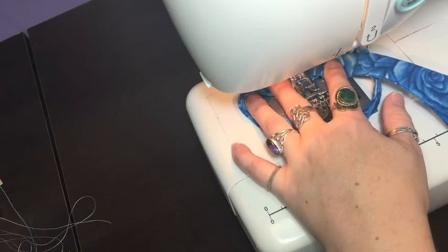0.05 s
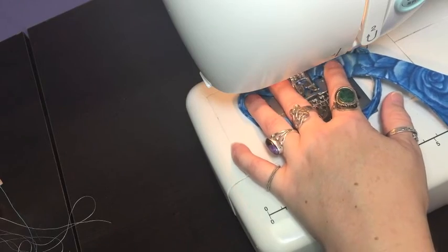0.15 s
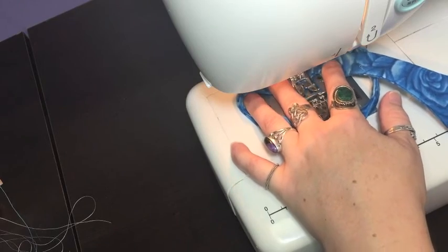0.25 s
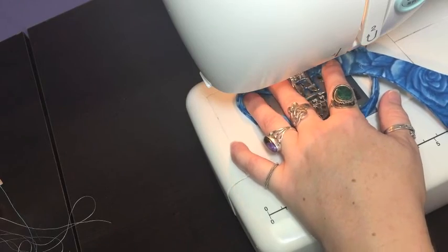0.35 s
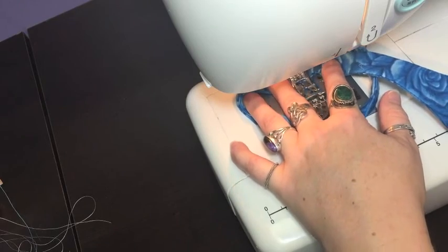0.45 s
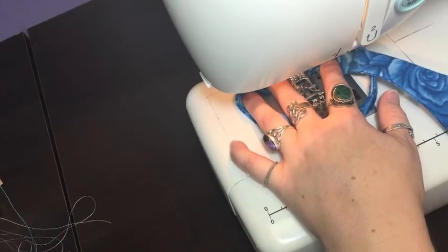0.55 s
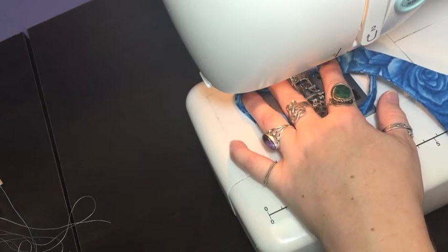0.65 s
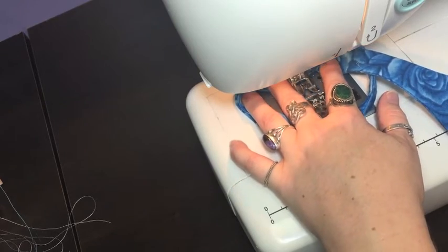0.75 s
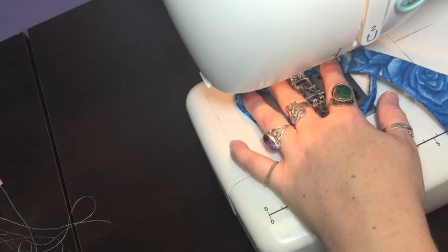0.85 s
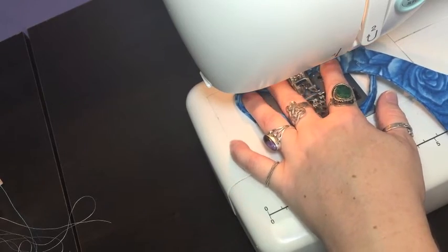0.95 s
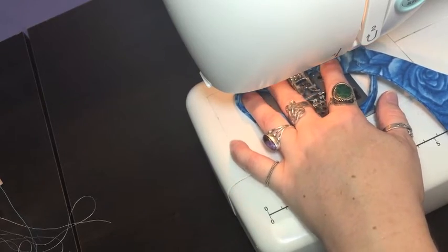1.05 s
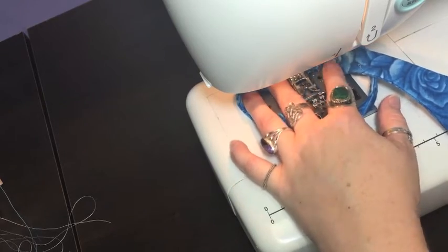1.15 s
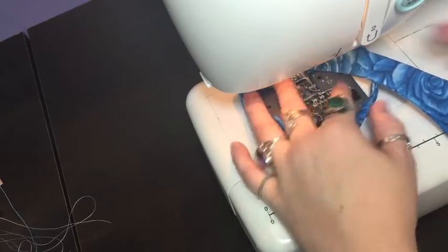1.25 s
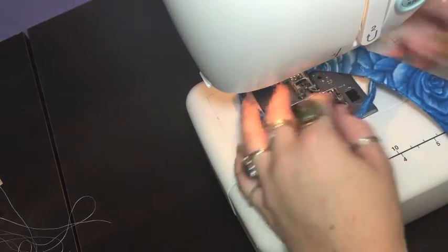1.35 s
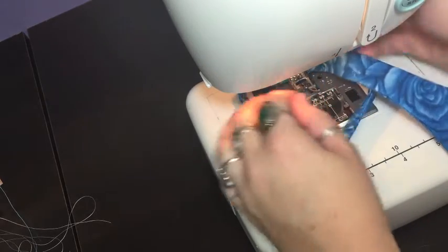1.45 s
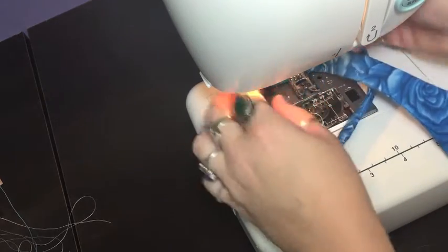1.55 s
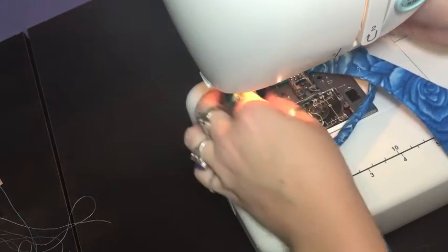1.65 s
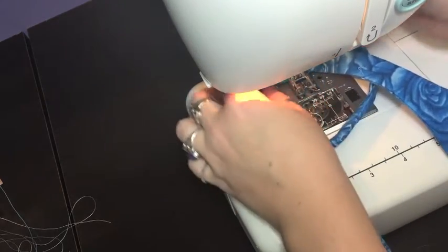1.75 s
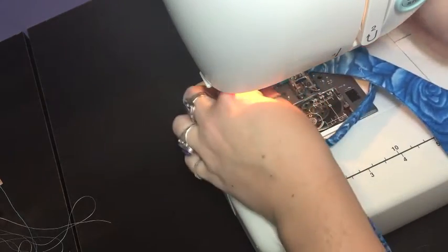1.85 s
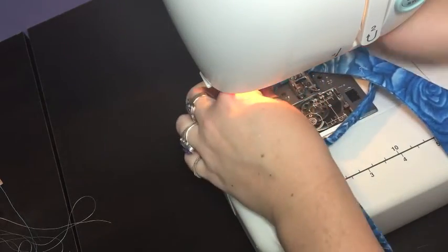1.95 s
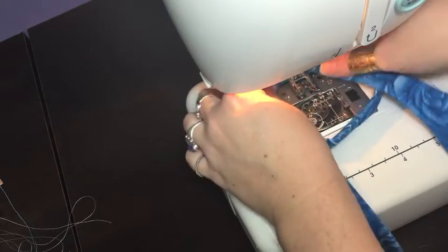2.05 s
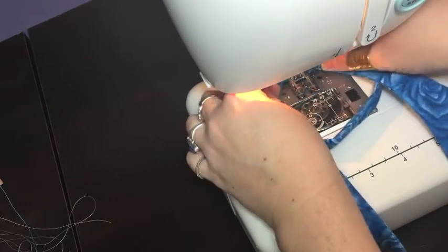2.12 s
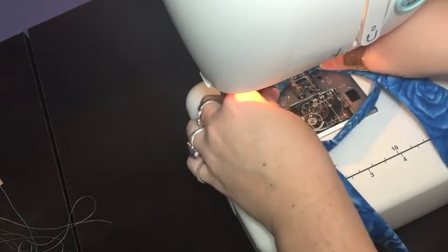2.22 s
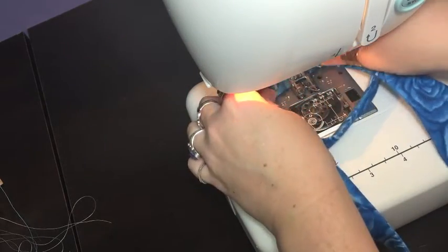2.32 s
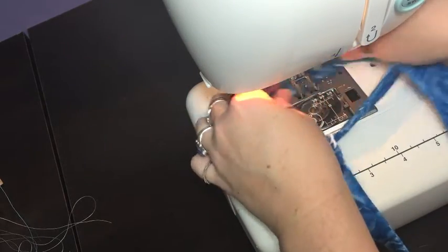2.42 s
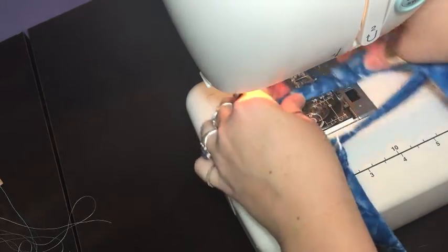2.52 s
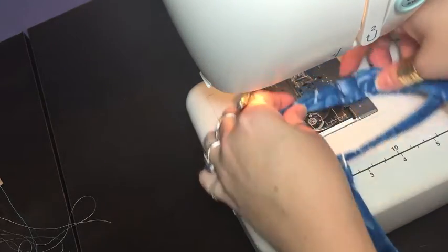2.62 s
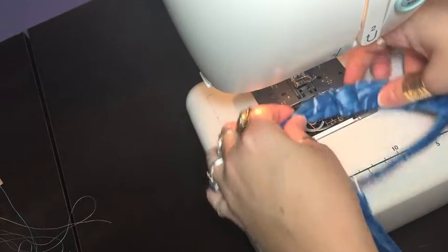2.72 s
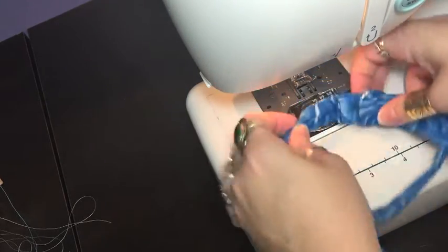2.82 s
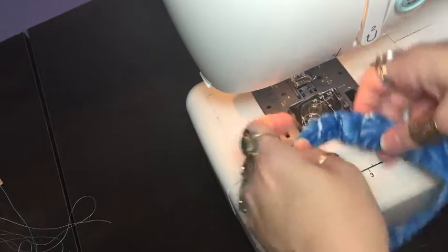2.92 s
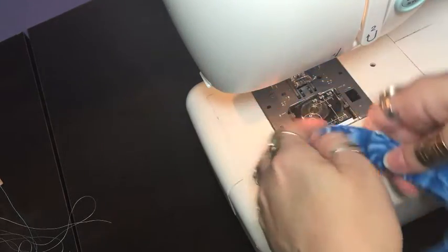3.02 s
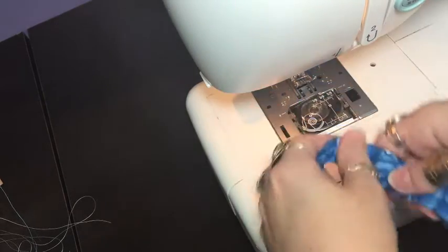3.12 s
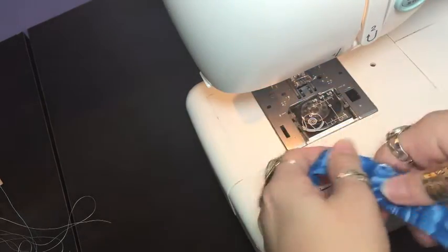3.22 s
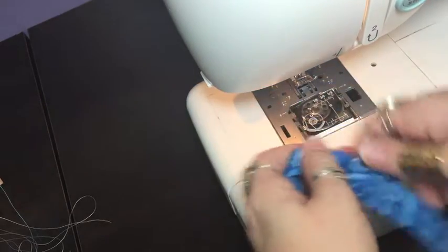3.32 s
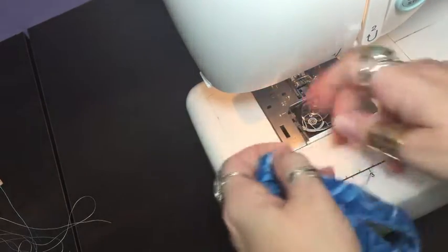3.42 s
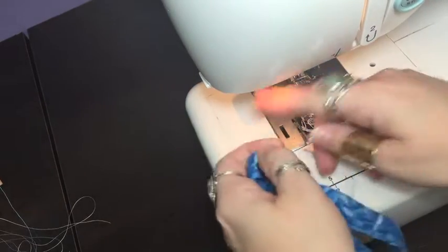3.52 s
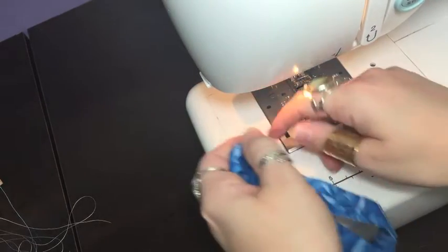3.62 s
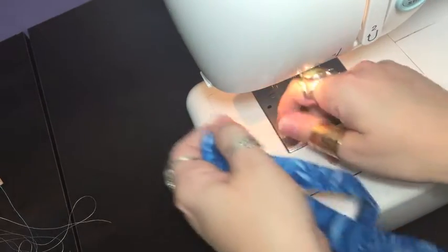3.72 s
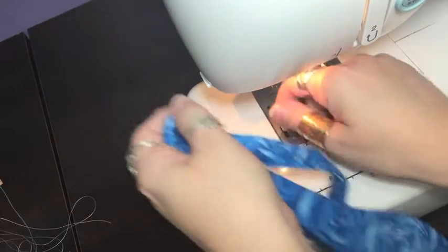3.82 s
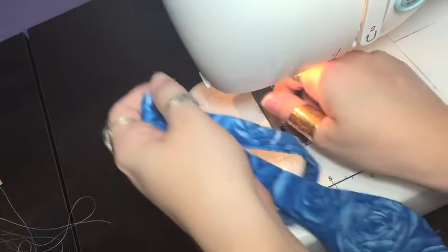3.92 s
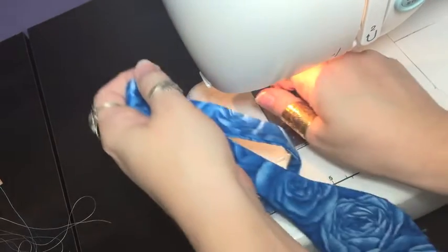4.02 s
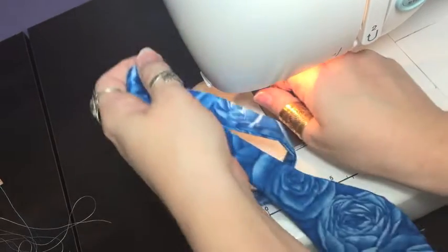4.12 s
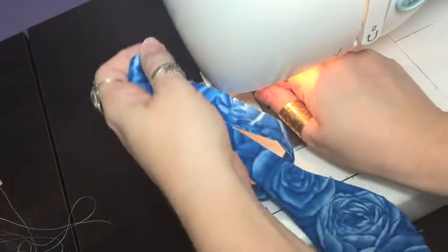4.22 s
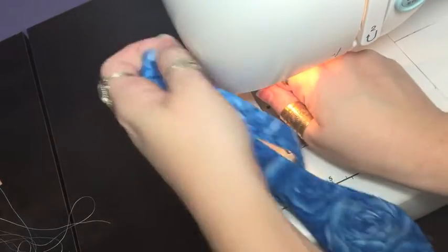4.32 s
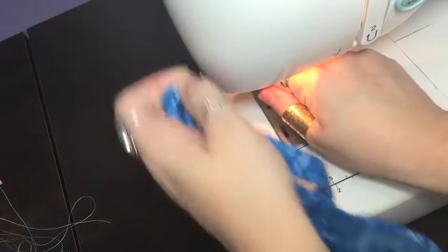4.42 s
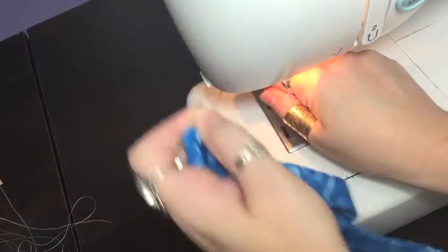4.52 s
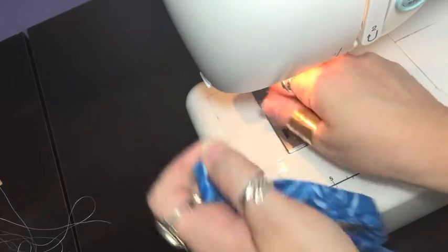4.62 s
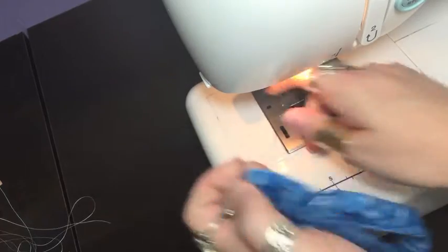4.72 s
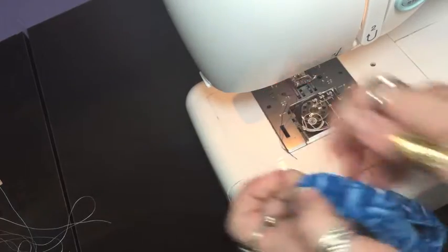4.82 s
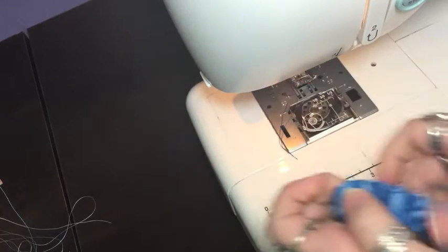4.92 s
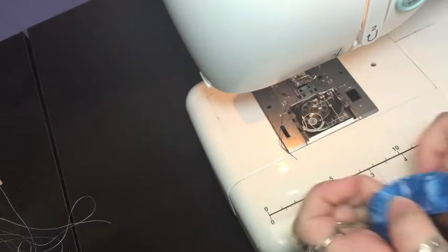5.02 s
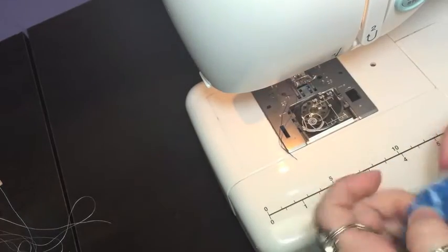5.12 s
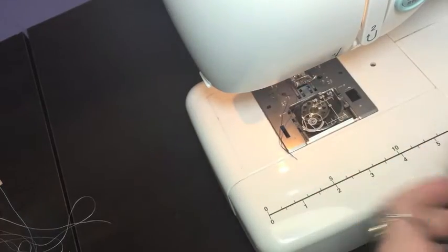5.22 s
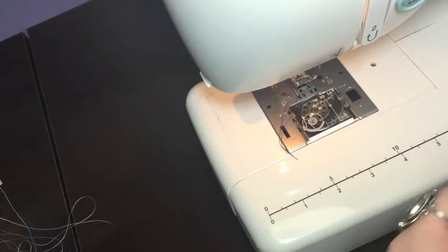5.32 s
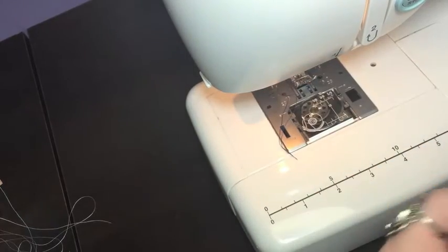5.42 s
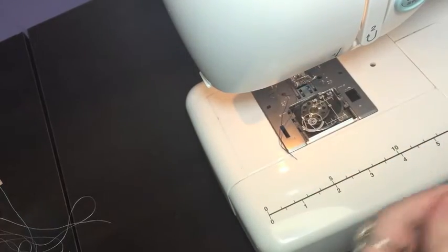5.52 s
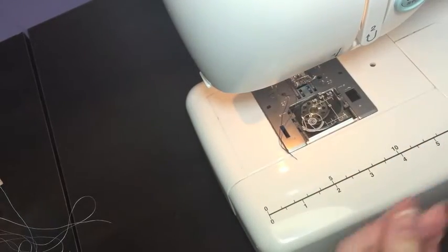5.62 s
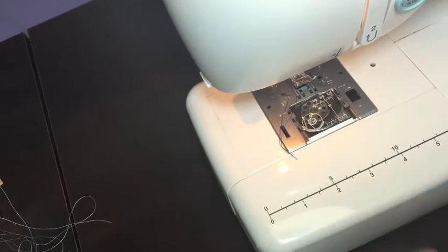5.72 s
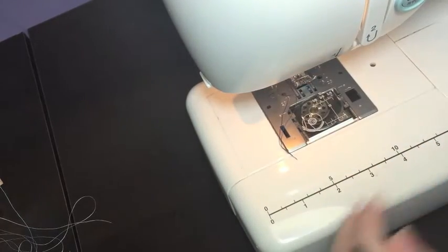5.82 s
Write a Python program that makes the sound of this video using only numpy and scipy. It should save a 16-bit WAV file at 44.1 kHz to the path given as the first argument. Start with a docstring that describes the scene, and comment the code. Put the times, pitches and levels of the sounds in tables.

```python
"""A small furnished room, a phone microphone close to a domestic sewing machine.
The motor hums, gears rumble and links rattle through three last stitches, each slower, then stop.
The presser foot is lifted; the work is drawn out, its threads slipping through the guides, ticking as
they catch, and rasping over metal edges and the side cutter. Levers, rings and fingernails click on
the plastic housing, and arms bump the table, all over quiet room air and a low hum."""
import sys
import numpy as np
from scipy import signal
from scipy.fft import rfft, irfft, next_fast_len
from scipy.io import wavfile
from scipy.ndimage import uniform_filter1d

SR = 44100
rng = np.random.default_rng(int(sys.argv[2]) if len(sys.argv) > 2 else 0)


def unload_audio(sound):
    """Save the sound as a 16-bit wav file, at the path given as the first command line argument."""
    columns = np.transpose(np.atleast_2d(sound))
    # keep every value between -1 and 1, then stretch to whole-number steps
    steps = np.round(np.clip(columns, -1, 1) * 32767)
    wavfile.write(sys.argv[1], SR, steps.astype(np.int16))


N = 258676
TIME = np.arange(N) / SR

# room tone spectrum: (frequency [Hz], level [dB])
AIR_SPECTRUM = [(15, -55), (25, -49), (44, -8), (66, 1.5), (91, -8.5), (122, -1), (198, -12.5), (227, -18),
                (267, -16), (482, -25), (537, -22), (631, -26.5), (1490, -26.5), (1750, -28.5),
                (15500, -47)]
# motor hum, swelling and sagging with the load: (time [s], level [dB])
MOTOR_HUM = [(0.0, -38.5), (0.118, -35), (0.142, -49), (0.206, -32.5), (0.244, -47), (0.288, -32.5),
             (0.454, -40), (0.526, -53), (0.556, -44), (0.604, -32), (0.658, -53), (0.734, -48),
             (0.828, -37.5), (0.924, -38), (1.032, -54), (1.08, -45), (1.172, -49), (1.22, -81)]
# motor whirr, rising as each stitch loads it: (time [s], pitch [Hz], level [dB])
MOTOR_WHIRR = [(0, 421, -60), (.17, 455.5, -50), (.3, 440, -83), (0.48, 429.5, -39.5), (0.572, 547, -60),
               (0.679, 497, -73), (1.1, 507, -51.5), (1.2, 464.4, -90)]
# drive on the gear train, easing once before the last stitch: (time [s], level [dB])
GEAR_DRIVE = [(0, -43.5), (0.11, -44), (0.61, -47), (0.701, -56.5), (0.77, -48.5), (0.86, -50), (1.11, -52),
              (1.19, -76)]
# spectra of the gear rumble and the link rattle: (frequency [Hz], level [dB])
RUMBLE_SPECTRUM = [(100, -15), (190, 5), (480, 3.5), (640, -6), (1000, -12), (3000, -90)]
RATTLE_SPECTRUM = [(300, -6), (750, 4.5), (1200, 5), (2000, -9), (3400, -10.5), (6000, -16.5), (10000, -21),
                   (15000, -29)]
# resonances of the housing and the thread path: (frequency [Hz], width [Hz], level [dB])
HOUSING_MODES = [(510, 25, -8), (720, 17, 9), (946, 45, 5), (1538, 68, 4), (1662, 37, 17.5), (1897, 90, 11),
                 (2695, 260, 10), (3180, 87, 9), (3620, 82, 11), (4270, 73, 5), (5800, 870, -0.5)]
THREAD_PATH_MODES = [(547, 32, -11.5), (757, 29, -0.5), (1008, 18.6, -2), (1203, 4.8, -3), (1458, 25, -0.5),
                     (1666, 25, -5), (2440, 33, -7)]
# edges of the bands in which a blow dies away: (frequency [Hz])
DECAY_BAND_EDGES = [150, 550, 1200, 2300, 4500, 8000, 16000]
# clicks of levers, rings and fingernails on the housing, and ticks of taut thread catching and slipping:
# (time [s], level [dB], ringing part [Hz], bass roll-off [dB/octave], treble roll-off [dB/octave],
# midrange t60 [s])
CLICKS_AND_TICKS = [(0.091, -50.5, 1230, -4, 5.5, 0.018), (0.102, -38.5, 710, 4.5, 10.5, 0.027),
                    (1.571, -37, 1900, 4.5, 5.5, 0.035), (1.585, -44, 1350, 5.5, 9, 0.13),
                    (1.647, -45.5, 1340, 7, 10, 0.14), (1.719, -44.5, 1010, 5, 8.5, 0.092),
                    (1.749, -50.5, 2800, 4, 15.5, 0.1), (1.789, -47.5, 2050, -1, 9.5, 0.11),
                    (1.798, -44, 725, -2, 5.5, 0.03), (1.970, -33, 1200, 8.5, 9, 0.03),
                    (2.056, -53.5, 1240, 16, 8, 0.22), (2.185, -50, 12200, 3, 0, 0.033),
                    (2.229, -52, 1430, 5, 6, 0.048), (2.395, -60.5, 735, -7, 0.5, 0.022),
                    (2.411, -51, 700, -3, 3, 0.07), (2.447, -51, 2010, 0, 4, 0.053),
                    (2.798, -57, 3830, 0.5, 6, 0.12), (2.823, -33, 2040, 21.5, 18, 0.076),
                    (2.857, -40.5, 2420, 12, 11.5, 0.089), (3.394, -58.5, 12000, 4, -3, 0.066),
                    (3.457, -58, 940, -9.5, 4.5, 0.036), (3.465, -49.5, 940, 8, 5.5, 0.034),
                    (3.773, -34, 3900, 6, 16.5, 0.075), (3.83, -39, 3870, 5, 15, 0.036),
                    (3.997, -56.5, 2580, 3, 8.5, 0.13), (4.346, -51, 2550, 19, 17, 0.076),
                    (4.347, -55, 1000, 4, 22, 0.06), (4.428, -54.5, 4330, 1, 2, 0.056),
                    (4.445, -47, 2840, 3, 6, 0.042), (4.471, -35.5, 2870, 10.5, 7, 0.041),
                    (4.516, -49.5, 975, -0.5, 7, 0.014), (4.691, -54.5, 1670, -1.5, 6, 0.093),
                    (4.762, -31.5, 2640, 6, 4, 0.021), (5.17, -73.5, 3020, -2.5, 1.5, 0.053)]
# needle strikes: (time [s], level [dB], duration [x first stitch], extra treble roll-off [dB/octave])
STITCHES = [(0.199, -44.5, 1.0, -0.5), (0.525, -40.5, 1.09, -1), (1.011, -46.5, 1.35, 3.5)]
# knocks of one stitch at the first one's pace; the two heavy ones touch lightly before they land:
# (time from the strike [s], level [dB], change per doubled duration [dB], struck part [Hz],
# bass roll-off [dB/octave], treble roll-off [dB/octave])
STITCH_KNOCKS = [(-0.052, 0, -40, 1810, 1, 5.5), (-0.009, -0.5, 0, 1000, 5, 9), (0, 0.5, 0, 1800, 7, 3.5),
                 (0.02, 0.5, -28, 1900, 0, 10.5), (0.055, -2.5, -17, 900, 0, 7),
                 (0.066, 2, -11, 1300, 1.5, 13)]
# arms and hands on the table: (time [s], pitch [Hz], level [dB], t60 [s])
TABLE_BUMPS = [(1.727, 218, -30.5, 0.079), (1.805, 292, -40.5, 0.1), (2.859, 201, -41.5, .2),
               (2.898, 77.7, -33.5, 0.15), (2.97, 58.7, -35, 0.2), (3.46, 226.4, -39.5, 0.17),
               (4.449, 222, -34, 0.23), (4.475, 119.5, -35, 0.4), (5.001, 108, -38, 0.47),
               (5.037, 88, -39, 0.056), (5.251, 102.4, -39.5, 0.24)]
# taut thread and cloth on metal edges and the cutter: (peak time [s], half length [s], level [dB])
THREAD_SCRAPES = [(2.11, .04, -68), (2.452, 0.036, -53), (3.07, 0.033, -64), (4.375, 0.027, -64),
                  (4.44, 0.039, -50.5), (5.16, 0.06, -74)]
# tugs drawing thread and cloth over the machine: (peak time [s], half length [s], level [dB])
THREAD_PULLS = [(2.482, 0.028, -42.5), (2.575, 0.042, -52), (2.74, 0.18, -58.5), (2.88, 0.035, -50),
                (3.0, 0.043, -47), (3.125, 0.027, -47.5), (3.215, 0.061, -50.5), (3.445, 0.017, -52),
                (3.76, 0.045, -55), (3.855, 0.068, -50.5), (4.04, 0.037, -55.5)]
# spectra of thread and cloth sliding and rasping: (frequency [Hz], level [dB])
SLIDE_SPECTRUM = [(150, -6), (400, 3.5), (800, -2.5), (1600, -3.5), (3000, -13.5), (4500, -30),
                  (15000, -26)]
RASP_SPECTRUM = [(400, -30), (1000, 12), (1600, -3), (2700, 8), (4300, 4.5), (7000, -2.5), (14000, -4)]


def undb(db):
    """Decibels to gain."""
    return 10 ** (np.asarray(db) / 20)


def unit(x):
    """Scale to rms 1."""
    return x / np.sqrt(np.mean(x ** 2))


def fader(s, db):
    """Gain along a level curve, silent outside it."""
    return undb(np.interp(TIME, s, db, left=-np.inf, right=-np.inf))


def swells(table):
    """Gain of strokes that each rise to a peak and fall away."""
    shape = 1.46  # 1 = pointed, 2 = bell
    return sum(undb(db) * np.exp(-np.abs((TIME - s) / half_s) ** shape) for s, half_s, db in table)


def decay(t, t60):
    """Gain falling 60 dB in t60 seconds."""
    return np.exp(-np.log(1000) * t / t60)


def walk(rate):
    """Smooth random drift of rms 1, with `rate` turns a second."""
    step = int(SR / rate)
    held = np.repeat(rng.standard_normal(N // step + 2), step)
    return unit(uniform_filter1d(held, step)[step // 2:][:N])


def band(x, lo_hz, hi_hz):
    """Causal band-pass."""
    return signal.sosfilt(signal.butter(3, [lo_hz, hi_hz], "band", fs=SR, output="sos"), x)


def colour(x, spectrum):
    """Shape by a (frequency [Hz], level [dB]) spectrum; rms 1."""
    hz, db = np.transpose(spectrum)
    size = next_fast_len(N)
    bins_hz = np.maximum(np.arange(size // 2 + 1) * SR / size, 1)
    gain = undb(np.interp(np.log(bins_hz), np.log(hz), db))
    return unit(irfft(rfft(x, size) * gain, size)[:N])


def ring(x, modes):
    """Sum of resonances given as (frequency [Hz], width [Hz], level [dB])."""
    return sum(undb(db) * signal.lfilter(*signal.iirpeak(hz, hz / width, fs=SR), x)
               for hz, width, db in modes)


def grains(rate, spread_db):
    """Tiny contacts of uneven size at random moments, about `rate` a second."""
    sizes = rng.standard_normal(N) * undb(spread_db * np.minimum(rng.exponential(size=N), 4))
    return unit(sizes * (rng.random(N) < rate / SR))


def tone(hz):
    """Sine of rms 1 on a moving pitch."""
    return np.sqrt(2) * np.sin(2 * np.pi * np.cumsum(hz) / SR)


def room_tone():
    """Steady air all round the microphone, with a wavering low hum."""
    air = colour(rng.standard_normal(N), AIR_SPECTRUM) * undb(-57)
    waver = undb(2.5 * walk(12))
    hum = undb(-63.5) * tone(59 + 2 * walk(10)) + undb(-64) * tone(120 + 5 * walk(13))
    return air + waver * hum


def motor():
    """The motor hums unevenly through the table and whirrs; shafts sing and whine with the drive."""
    s, db = np.transpose(MOTOR_HUM)
    hum_hz = 123.8 * (1 + 0.019 * walk(25.3))
    hum = (tone(hum_hz) + undb(-17) * tone(2 * hum_hz)) * fader(s, db - 0.4)
    s, hz, db = np.transpose(MOTOR_WHIRR)
    whirr = tone(np.interp(TIME, s, hz) * (1 + 0.016 * walk(68.9))) * fader(s, db)
    shaft_modes = [(191, 5.1, 21.5), (755, 10, 3.5), (1210, 11, 0), (2057, 50, -3.5)]
    shafts = unit(ring(rng.standard_normal(N), shaft_modes))
    whine = tone(2820 * (1 + 0.00964 * walk(19) + 0.0242 * walk(300)))
    singing = (undb(-6.5) * shafts + undb(-18.5) * whine) * undb(2.8 * walk(29.6))
    return hum + whirr + singing * fader(*np.transpose(GEAR_DRIVE))


def gears():
    """Teeth and belt rumble in the frame; loose links rattle, most around the strongest stitches."""
    rumble = colour(grains(1500, spread_db=1.5), RUMBLE_SPECTRUM)
    contacts = grains(2500, spread_db=1.9)
    links = colour(undb(-6) * contacts + ring(contacts, THREAD_PATH_MODES), RATTLE_SPECTRUM)
    full_stitch_db = -41.5
    shaking = swells([(s, 0.034 * duration, db - full_stitch_db) for s, db, duration, _ in STITCHES])
    rattle = links * (undb(-11) + undb(-5) * shaking)
    return (rumble + rattle) * fader(*np.transpose(GEAR_DRIVE))


def blows(table, rise_s, trim_db, chatter_db, part_db, bass_linger):
    """Each blow chatters briefly and rings one part and the housing; low bands last longer."""
    out = np.zeros(N + SR)
    t = np.arange(SR // 4) / SR
    for s, db, part_hz, bass_rolloff, treble_rolloff, t60 in table:
        chatter = rng.standard_normal(len(t)) * (1 - np.exp(-t / rise_s))
        modes = HOUSING_MODES + [(part_hz, part_hz / 10, part_db)]
        for lo, hi in zip(DECAY_BAND_EDGES, DECAY_BAND_EDGES[1:]):
            octaves = np.log2(np.sqrt(lo * hi) / part_hz)
            slope_db = bass_rolloff * min(octaves, 0) - treble_rolloff * max(octaves, 0)
            push = chatter * decay(t, t60 * (DECAY_BAND_EDGES[3] / hi) ** bass_linger)
            sound = band(undb(chatter_db) * push + ring(push, modes), lo, hi)
            onset_rms = np.sqrt(np.mean(sound[:SR // 50] ** 2))
            out[int(s * SR):][:len(t)] += sound / onset_rms * undb(db + slope_db + trim_db)
    return out[:N]


def clicks_and_ticks():
    """Levers, rings and fingernails click on the housing; taut thread ticks as it catches and slips."""
    return blows(CLICKS_AND_TICKS, rise_s=0.0014, trim_db=0.6, chatter_db=1.5, part_db=15,
                 bass_linger=0.4)


def stitching():
    """Every stitch plays the same knocks; a slower one spreads them out and softens most of them."""
    t60_s = 0.062
    knocks = []
    for s, db, duration, dulling in STITCHES:
        for delay, knock_db, slow_db, part_hz, bass, treble in STITCH_KNOCKS:
            level_db = db + knock_db + slow_db * np.log2(duration)
            knocks.append((s + delay * duration, level_db, part_hz, bass, treble + dulling, t60_s))
    return blows(knocks, rise_s=0.0025, trim_db=-1, chatter_db=5.5, part_db=-3, bass_linger=0.46)


def table_bumps():
    """Soft bumps of the arms swell and die in two low modes of the table."""
    out = np.zeros(N + SR)
    t = np.arange(SR // 2) / SR
    for s, hz, db, t60 in TABLE_BUMPS:
        swell = (1 - np.exp(-t / 0.0077)) * decay(t, t60)
        modes = np.sin(2 * np.pi * hz * t) + 0.56 * np.sin(2 * np.pi * 1.43 * hz * t)
        out[int(s * SR):][:len(t)] += undb(db - 6) * swell / swell.max() * modes
    return out[:N]


def thread():
    """Thread sticks and slips through the guides and tension discs, and rasps over metal edges."""
    slips = grains(2000, spread_db=0.46) * undb(1.8 * walk(45))
    # the contact point wanders, so each resonance comes and goes on its own
    guides = sum(ring(slips, [(hz, 1.5 * width, db)]) * undb(2.3 * walk(14))
                 for hz, width, db in THREAD_PATH_MODES)
    cloth_swish = undb(-17.5) * rng.standard_normal(N)
    sliding = colour(cloth_swish + guides, SLIDE_SPECTRUM)
    fibres = grains(4500, spread_db=2.9)
    rasp = colour(undb(10) * fibres + ring(fibres, HOUSING_MODES), RASP_SPECTRUM)
    return (sliding + undb(-20.5) * rasp) * swells(THREAD_PULLS) + rasp * swells(THREAD_SCRAPES)


def walls(x, wet_db, t60_s, treble_t60_s):
    """The furnished room sends a short diffuse tail back to the microphone."""
    t = np.arange(SR // 2) / SR
    reflections = rng.standard_normal(len(t)) * (1 - np.exp(-(t / 0.011) ** 2))
    low = band(reflections, 225, 2360)
    high = band(reflections, 2100, 6800) + undb(-2.5) * band(reflections, 6560, 14200)
    tail = low * decay(t, t60_s) + undb(-2.1) * high * decay(t, treble_t60_s)
    return undb(wet_db) * signal.fftconvolve(x, tail / np.sqrt(np.sum(tail ** 2)))[:N]


def scene():
    """Machine, hands and thread close to the microphone, the room faint behind them; mono."""
    close = stitching() + clicks_and_ticks() + motor() + gears() + table_bumps() + thread()
    return (close + walls(close, wet_db=-15, t60_s=0.17, treble_t60_s=0.19) + room_tone())[None]


def record(dry):
    """The phone cuts the top treble steeply."""
    top_hz = 15400
    return signal.sosfilt(signal.ellip(10, 0.2, 70, top_hz, fs=SR, output="sos"), dry)


dry = scene()
out = record(dry)
unload_audio(out)
```